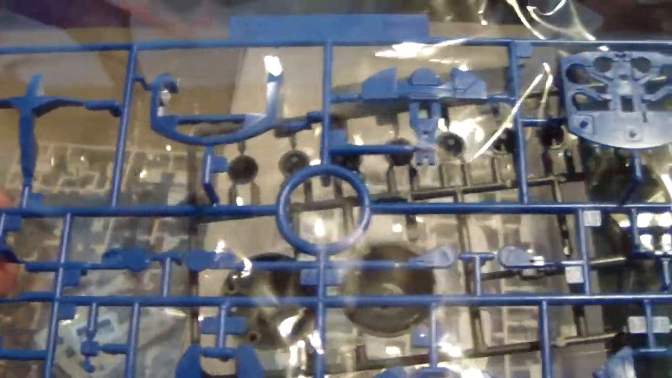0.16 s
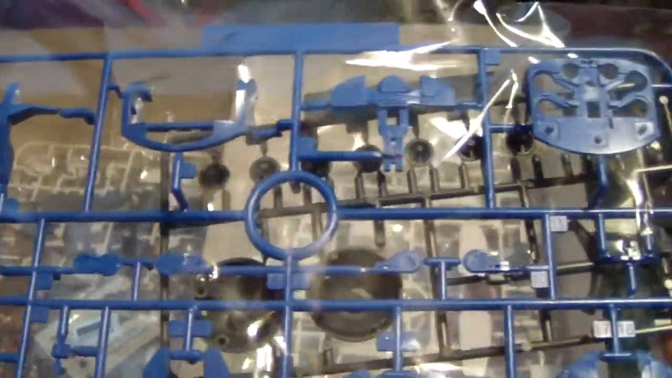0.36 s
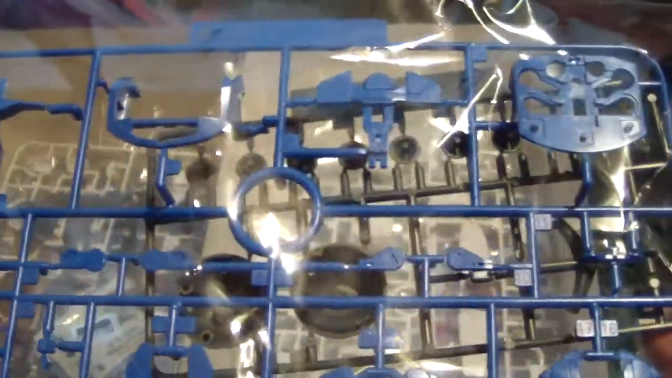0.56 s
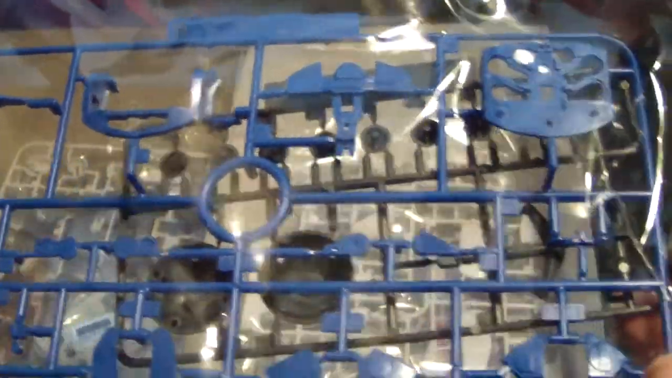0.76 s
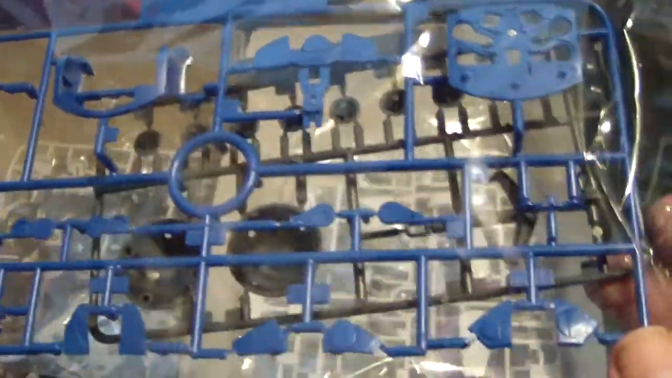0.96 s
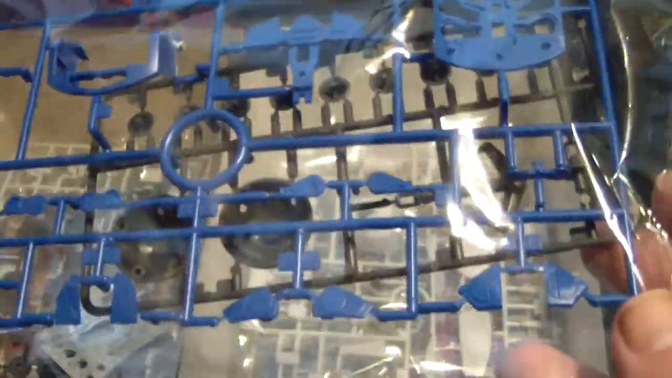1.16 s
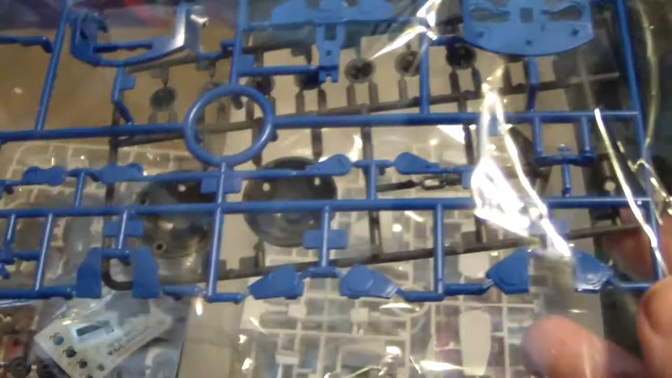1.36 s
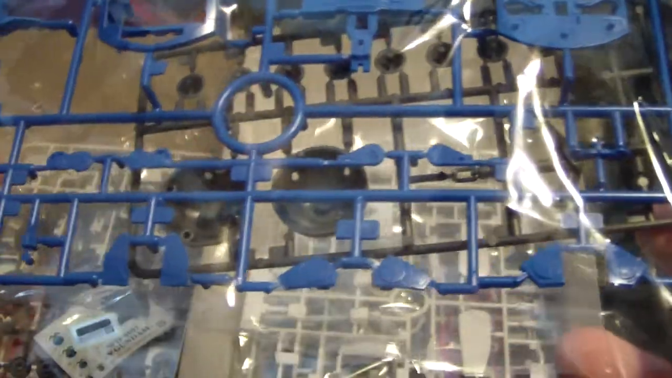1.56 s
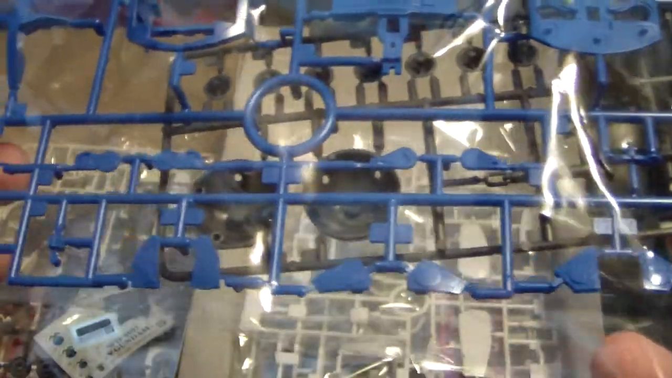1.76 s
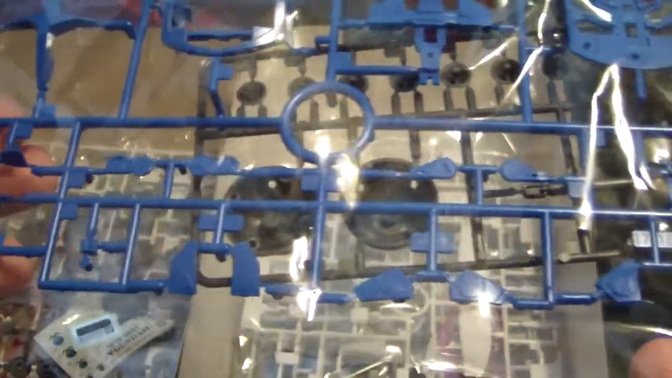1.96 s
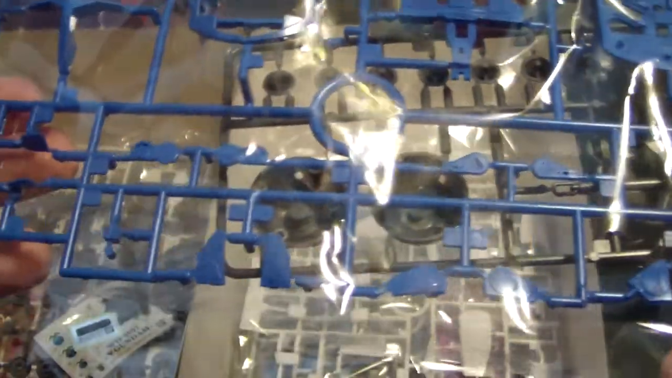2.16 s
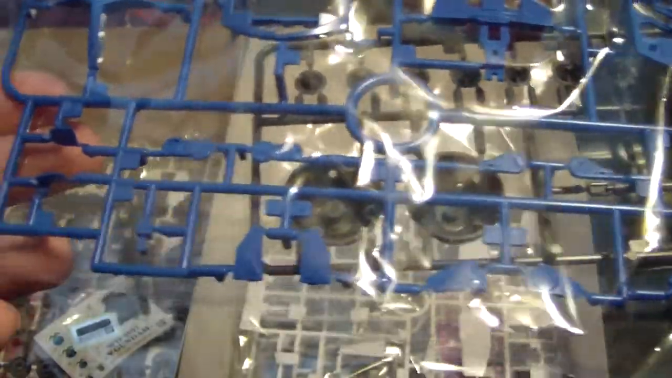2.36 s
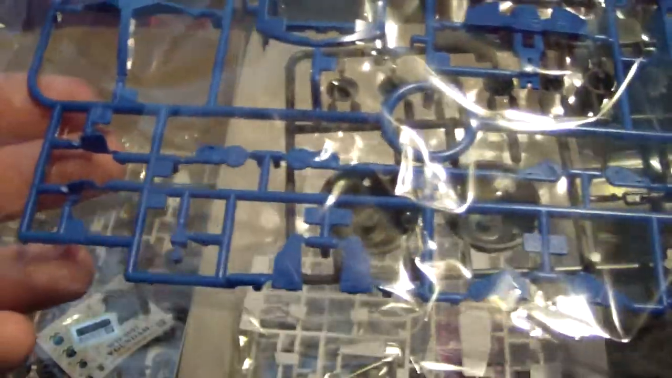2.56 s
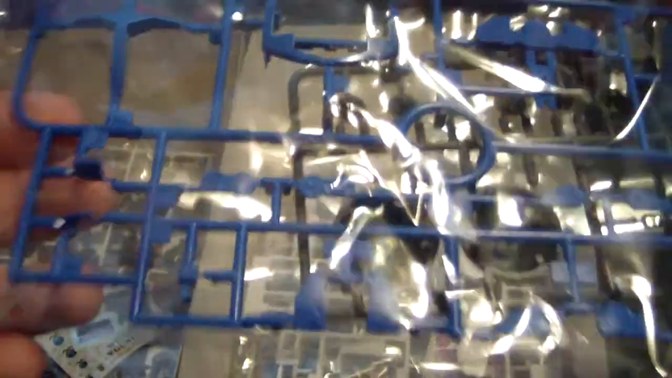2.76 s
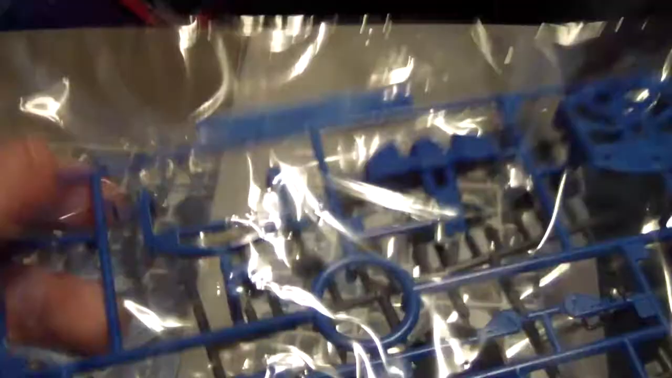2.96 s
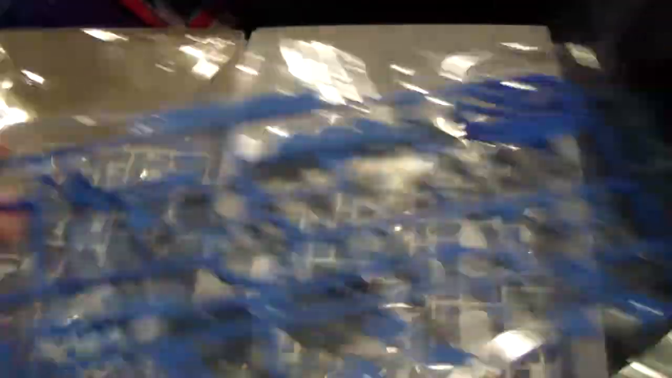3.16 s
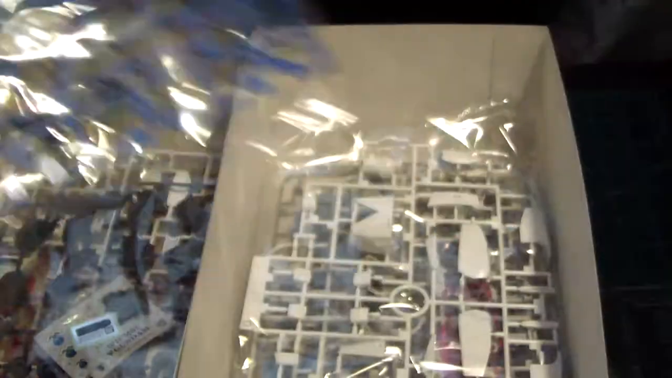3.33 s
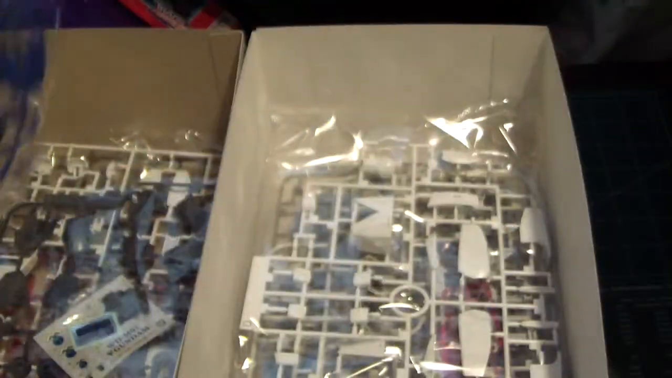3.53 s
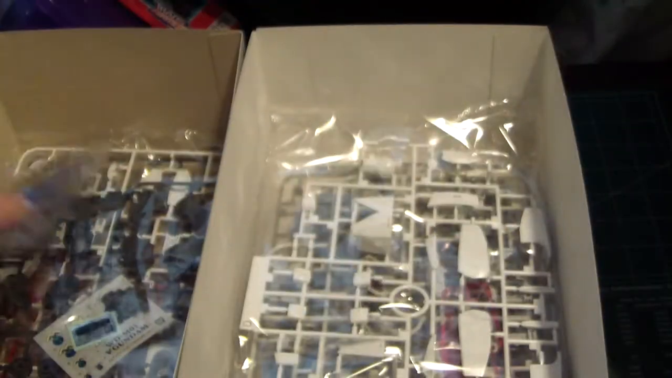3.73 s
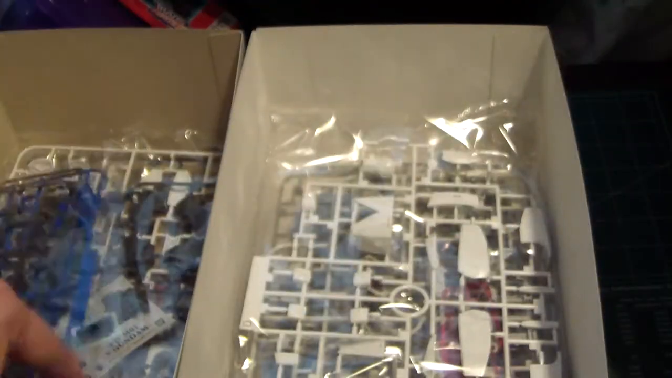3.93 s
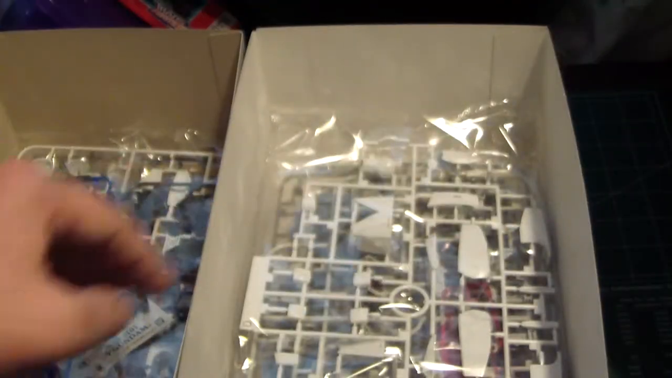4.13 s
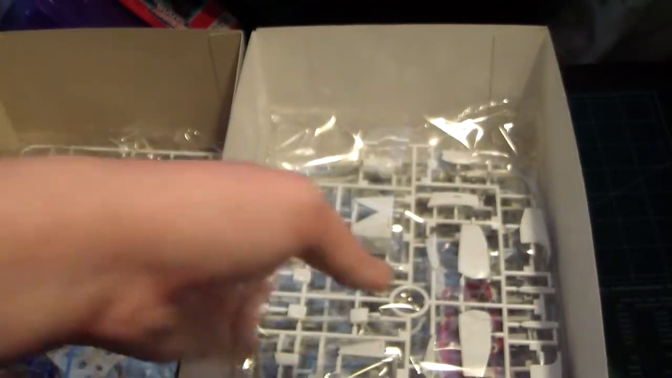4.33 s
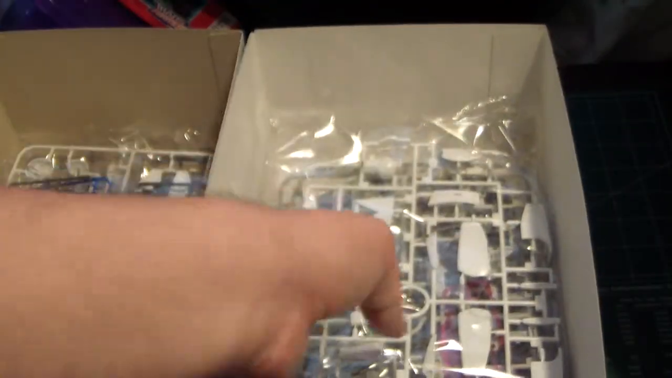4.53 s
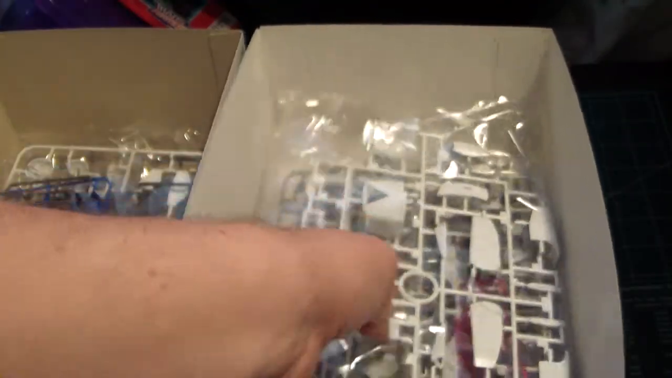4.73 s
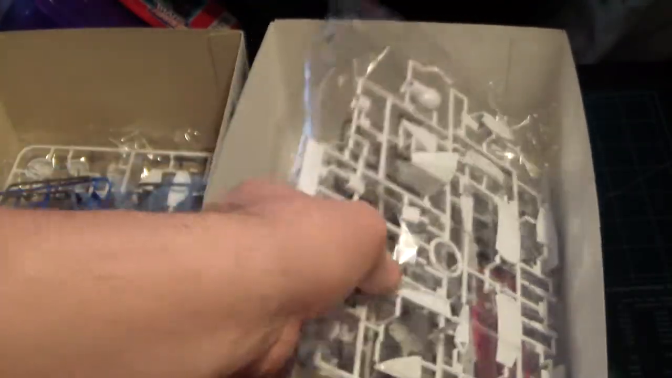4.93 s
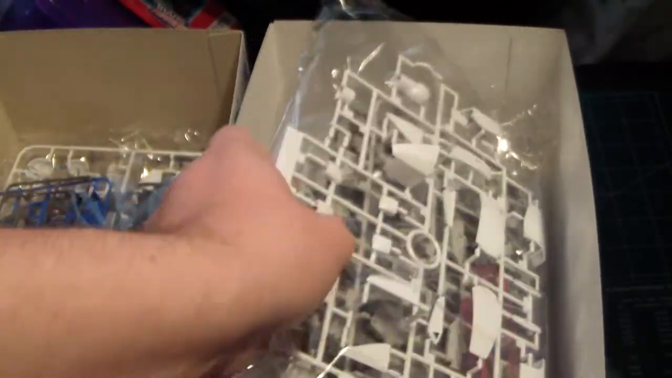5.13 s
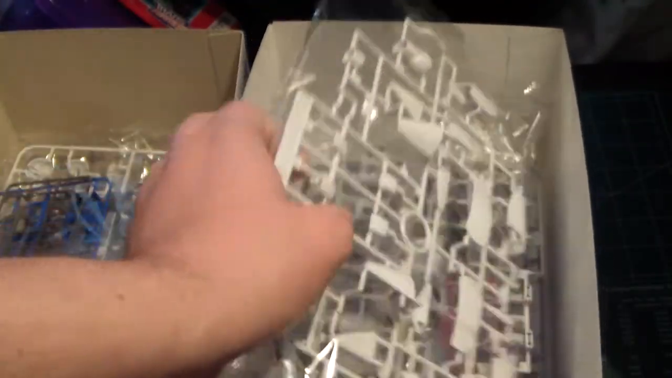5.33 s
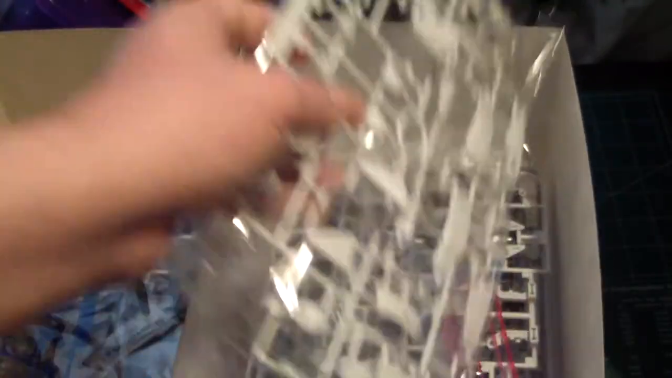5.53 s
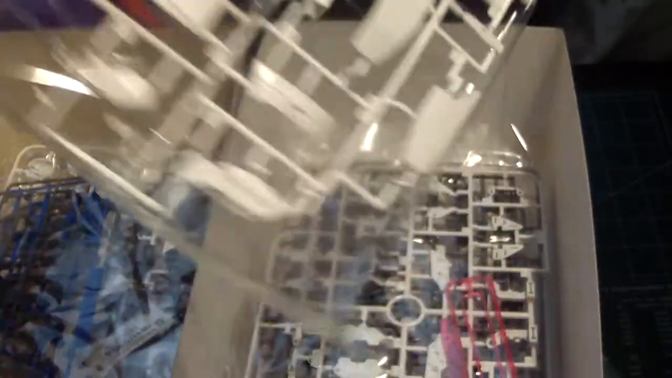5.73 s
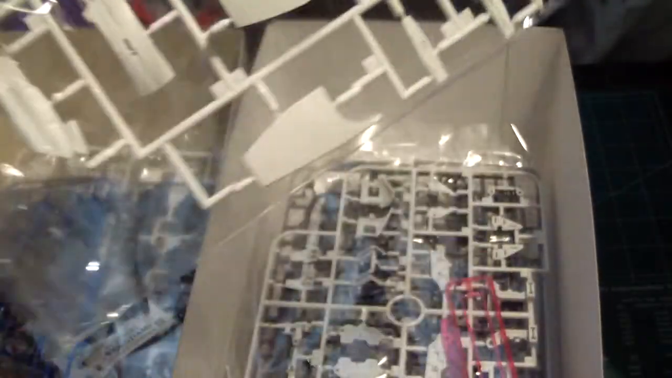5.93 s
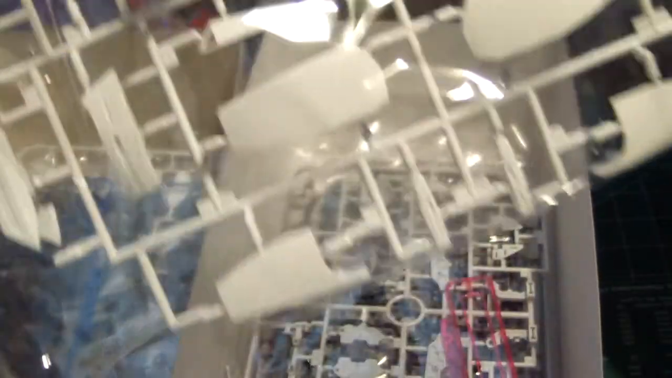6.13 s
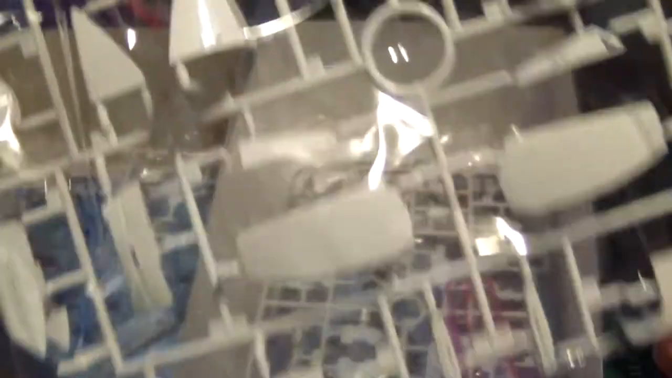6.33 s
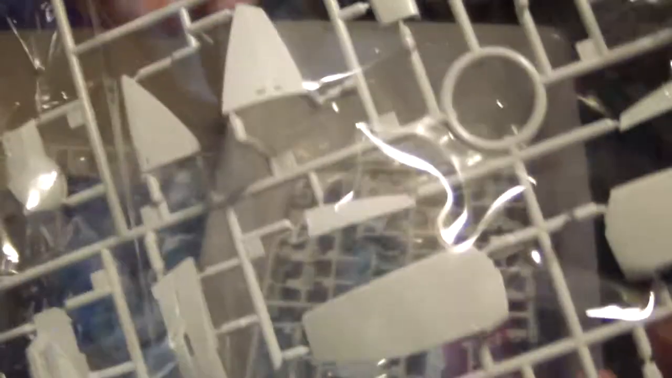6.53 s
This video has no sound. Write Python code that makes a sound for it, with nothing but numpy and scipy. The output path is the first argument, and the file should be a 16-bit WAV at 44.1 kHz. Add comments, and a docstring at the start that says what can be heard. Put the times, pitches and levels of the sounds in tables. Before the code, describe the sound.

Thin plastic bags of moulded parts crinkle and snap close up, faint at first, then in bursts with light rattles over a low fan hum.

```python
"""A thin plastic bag of moulded parts is held up and tilted, turned over, then laid in a cardboard box;
the next bag is gripped, pulled out and raised, all close to a pair of microphone ports.
Creases snap as short noise bursts in facet-sized bands, over crackle that follows the strokes of the hands.
Frames knock as rattles through ringing modes, and moving bags push puffs of low noise at the microphone.
Throughout, shaped noise makes the fan, wavering sines the mains hum, and sparse echoes the small room."""
import sys
import numpy as np
from scipy import signal
from scipy.fft import rfft, irfft
from scipy.io import wavfile
from scipy.ndimage import uniform_filter1d

SR = 44100
rng = np.random.default_rng(int(sys.argv[2]) if len(sys.argv) > 2 else 0)


def store_pcm(level_fs):
    """Save levels as 16-bit WAV."""
    pcm = np.round(np.clip(level_fs, -1, 1) * 32767).astype(np.int16)
    wavfile.write(sys.argv[1], SR, np.atleast_2d(pcm).T)


N = 290619  # samples, about 6.6 s

# the clearest buckling creases: t/s, facet f/Hz, level/dB (midway between facet and treble, before SNAP_LIFT_DB),
# brightness/dB (treble over facet), bite/dB (middle band over level), ring/ms (1/e, never under 0.2)
CLEAR_SNAPS = [(.3716, 1510, -15, 7, -11.5, 0.22), (.5438, 1800, -32.5, -10, 4, 1.8),
               (.5487, 970, -32, -15, 5, 0.49), (.6285, 800, -43.5, -20, 2, 1.1),
               (.6868, 2370, -28.5, -2, -5, 0.34), (.745, 1500, -35, -9, -15, 0.54),
               (.8197, 2416, -19, -1.5, -22, .9), (.836, 1946, -23.5, -8, -18, 0.23),
               (.8435, 2300, -30, 18, 1, 1.2), (.913, 1240, -25, -9.5, -1.5, 2.9),
               (.9517, 1404, -16.5, 3.5, -3.5, 0.95), (.9911, 2670, -14.5, 3.5, -8, 0.18),
               (1.004, 1473, -22, -1, -1, 0.33), (1.07, 1200, -30.5, 4, -0.5, 1.6),
               (1.2187, 1315, -18, -18.5, 0.5, .2), (1.5773, 1974, -28.5, -1, -7, 1.67),
               (1.601, 2237, -22, 6, -3, 0.93), (1.8694, 2436, -32, -3, 1, 0.96),
               (1.9212, 1800, -35, -2, 9.5, .4), (2.0342, 1730, -19, 14.5, 0, 0.89),
               (2.1583, 700, -34.5, 1, -5, 1), (2.3779, 2340, -19, 0.5, -3, 0.13),
               (2.4127, 2750, -30, 9, 6.5, .8), (2.5164, 2015, -34.5, -1, 9.5, .4),
               (2.7796, 1400, -28, -1, -1, 1.1), (2.7955, 1904, -25, 15, 1, 0.2),
               (2.817, 1890, -21, -2, 2, 1.5), (2.8472, 1300, -19, 2.5, -4.5, 0.45),
               (2.8847, 2000, -12, 6, -7, 1.6), (2.917, 2080, -8.5, 3, -5.5, 0.18),
               (2.9961, 2320, -15, -14.5, -17, 1.2), (3.029, 2423, -10, 6, -0.5, 0.86),
               (3.0566, 2200, -16, 8, -6, 0.48), (3.067, 1100, -14.5, 10, -0.5, 0.64),
               (3.0799, 2300, -18, 16, -2, 0.55), (3.0973, 1490, -17, 4, -1, 0.73),
               (3.116, 1300, -18.5, 16, 1, 1.7), (3.1462, 1400, -13.5, 11, -2, 1.3),
               (3.2015, 2370, -12.5, 6, -2, 0.75), (3.2177, 1700, -24, 7, 1, 0.49),
               (3.2494, 1254, -11, 5, -3.5, 1.4), (3.35, 2400, -32, 0, -16, 1.2),
               (3.4455, 1100, -33, -8, -2.5, 2.4), (3.6447, 1194, -17.5, 6.5, -6, 2.6),
               (3.6701, 1290, -12, 3.5, -2, 0.79), (3.6991, 2277, -14, 14, 3, 0.39),
               (3.739, 2240, -8, -1, -2.5, 1.7), (3.766, 1500, -17.5, 22, 0.5, 1.7),
               (3.8016, 2500, -21.5, 19, 4.5, 1.5), (3.8252, 1418, -19, 7, -1.5, 3),
               (3.8819, 1390, -16, 10, -14, 1.8), (3.9096, 1890, -19, 18, 0, .9),
               (3.9489, 1984, -12.5, 8, -1, 1.4), (3.9749, 1750, -9.5, 4, -2, 4.8),
               (4.0124, 1270, -17, 10, -1.5, 1.1), (4.026, 1320, -21.5, 26, -9, 0.89),
               (4.076, 2020, -9.5, 11, -3.5, 0.41), (4.1113, 2000, -25, 6, 3, 1),
               (4.1254, 978, -13, 15, -2, 1.3), (4.1646, 1615, -27, 4, 0, 1.7),
               (4.4521, 1200, -15.5, -7.5, -2.5, 4.6), (4.4935, 1610, -16.5, 12, -1, 3.1),
               (4.5371, 2010, -10, 8.5, -1.5, 1.2), (4.6313, 2220, -12.5, 16.5, 1, 1),
               (4.6951, 1692, -12, 6.5, -0.5, 3.3), (4.7002, 1400, -9, -1, -7, 1.6),
               (4.7572, 2170, -8, -0.5, -2, 1.1), (4.8488, 2216, -17.5, 14, 2, 0.68),
               (4.8829, 1403, -12.5, 2, -6.5, 2.9), (4.903, 2000, -15, 17, -4, 2.2),
               (4.9773, 2215, -27, 4, 8, .6), (4.9946, 1826, -11, 5, -1, 3.5),
               (5.0022, 1500, -11.5, 13, -3.5, 1.6), (5.1258, 2100, -24, 15, -7, .6),
               (5.1483, 2500, -16, 24, 4, 0.93), (5.1955, 1900, -17, 10, 0.5, 1.6),
               (5.2346, 2200, -14, 0, -6, 1.64), (5.2487, 980, -18.5, 15, -2, 0.85),
               (5.294, 2080, -11.5, 0, -17, 1.4), (5.3432, 2220, -12.5, 16, 2.5, 0.54),
               (5.4123, 1204, -18, 15, -3, .4), (5.475, 1326, -7.5, 7, -2.5, 2.8),
               (5.4933, 1900, -11.5, 4, -3.5, 1.6), (5.6046, 1660, -8, 4, -2, 2.2),
               (5.6512, 2300, -26.5, -17, 4, 1.4), (5.6777, 2400, -12, 7.5, -1.5, 2.4),
               (5.71, 1830, -19, 5, -4.5, 1.2), (5.7346, 1198, -26, -7.5, 3.5, 0.78),
               (5.778, 1290, -18.5, -7, -1.5, 3.3), (5.8168, 1385, -15.5, -3, 5.5, 0.29),
               (5.829, 1900, -15, 3.5, -1, 0.43), (5.8411, 1700, -18, 9, 1, .5),
               (5.854, 1500, -12, 20, -17, 0.58), (5.8806, 2400, -15.5, 8.5, -2, 0.53),
               (5.918, 2480, -18.5, -1, -4, 1.3), (5.956, 1290, -30, -7, 3, 1),
               (5.973, 1590, -18.5, 0, -4.5, 4.2), (5.979, 1690, -13, 13, 0.5, 0.48),
               (6.0001, 2520, -18.5, 19, 3.5, .4), (6.0427, 1800, -17.5, 5, -6, 3.2),
               (6.0565, 2606, -21, 20, 6, 0.99), (6.1347, 1720, -9, 10.5, -4.5, 2),
               (6.167, 2000, -22.5, 3, 1, 0.75), (6.1875, 1300, -29, -19, 0, 0.96),
               (6.2443, 1870, -9, -2.5, -1, 0.55), (6.2729, 1930, -14, 8, -1.5, 2.5),
               (6.311, 1600, -24, -4, -4, 1.5), (6.3711, 889, -22.5, -8.5, -3, 3.6),
               (6.383, 1204, -20.5, -3, -3, 1.7), (6.4045, 2010, -33, -20, -4, 0.51),
               (6.4604, 2150, -7.5, 12, -2, 0.68), (6.5242, 1900, -16.5, 7.5, 2, 2),
               (6.5885, 1100, -10.5, 17, -4, 1.4)]
# sparkle bands, middle then treble: low f/Hz, high f/Hz
SPARKLE_BANDS = [(2900, 5230), (6600, 13350)]
# colour of all the snaps: f/Hz, level/dB (filter gain)
SNAP_TONE = [(300, 1.5), (1200, -0.5), (4000, 4), (5800, 2), (8000, 3.5), (10000, 1.5), (12500, -2),
             (16000, 2.5)]
SNAP_LIFT_DB = 15.5


def snaps(level_db, size=900, after=0.047, after_ms=5, breadth=1.48, flap_db=-8, flap_lo_hz=330):
    """A crease flips: a facet of film rings for a few milliseconds at most under a bright shiver."""
    creases = CLEAR_SNAPS + lesser_snaps(level_db)
    out = np.zeros((2, N))
    ms = np.arange(size) * 1000 / SR
    ring_ms = np.maximum(np.array(creases)[:, -1, None, None], .2)
    shivers = rng.standard_normal((len(creases), 2, size))
    shivers *= np.exp(-ms / ring_ms) + after * np.exp(-ms / after_ms)  # the rest of the sheet rings on faintly
    sparkle = np.stack([band(shivers, lo, hi) for lo, hi in SPARKLE_BANDS], 1)
    for (s, facet_hz, db, bright_db, bite_db, _), shiver, bright in zip(creases, shivers, sparkle):
        levels_db = [db - bright_db / 2, db + bite_db, db + bright_db / 2]  # facet, middle, treble
        facet = band(shiver, facet_hz / breadth, facet_hz * breadth)
        # the slack film around it moves too
        flap = band(shiver, flap_lo_hz, max(facet_hz / 2, flap_lo_hz + 100))
        parts = np.array([facet - amp(flap_db) * flap, *bright])
        parts /= np.linalg.norm(parts, axis=-1, keepdims=True)
        add(out, s, np.tensordot(amp(levels_db), parts, 1))
    return amp(SNAP_LIFT_DB) * colour(out, SNAP_TONE)


# lesser creases: rate and level (before SNAP_LIFT_DB) are those under a firm grip
FIRM_DB, LESSER_PER_S, LESSER_DB = -23, 32, -23
LESSER_RATE_LAW, LESSER_LEVEL_LAW = .4, 0.62  # dB of rate and of level per dB of flexing


def lesser_snaps(level_db, facet_hz=1700, spread_octaves=0.49, spread_db=4.0, bright_db=5,
                 bright_spread_db=6, bite_db=-3, bite_spread_db=4, ring_ms=1.5, count=500):
    """Chance snaps, as rows like CLEAR_SNAPS: harder flexing makes them more frequent and louder."""
    rows = []
    draws = rng.random((count, 2))
    characters = np.clip(rng.standard_normal((count, 4)), -2, 2)
    for (place, chance), (pitch, strength, tint, bite) in zip(draws, characters):
        effort_db = level_db[int(place * N)] - FIRM_DB
        per_s = LESSER_PER_S * amp(LESSER_RATE_LAW * effort_db)
        if chance < per_s * N / SR / count:
            rows.append((place * N / SR,
                         facet_hz * 2 ** (spread_octaves * pitch),
                         LESSER_DB + LESSER_LEVEL_LAW * effort_db + spread_db * strength,
                         bright_db + bright_spread_db * tint,
                         bite_db + bite_spread_db * bite,
                         ring_ms))
    return rows


# colour of the crackling film: f/Hz, level/dB (filter gain)
FILM_TONE = [(150, -35), (250, 6), (460, -1), (510, 0.5), (845, -1.5), (1220, 3.5), (1450, -3.5),
             (1700, -0.5), (2490, 0), (3230, 1.5), (5830, -4.5), (7060, 0), (9830, 0), (15200, -5),
             (16000, -6)]


def crackle(level_db, taut_db, per_s=1100, spread_db=0.0, clump_db=1.5, facet_db=5, patch_db=2, count=9):
    """Many tiny creases give way, more often under harder flexing, while film rubs on film."""
    ring_s, rub = .0004, .4
    rate = per_s * amp(0.35 * (level_db + 24))  # per_s holds at -24 dB
    gives_way = rng.random(N) < rate / SR
    strength = amp(spread_db * np.minimum(rng.exponential(1, N), 3.2))  # a spread of 0 makes all pops equal
    pops = gives_way * strength / np.sqrt(rate)
    grip = np.clip(amp(0.4 * (level_db + 25.5)), 0, 1)  # lightly touched film slides more than it buckles
    edges = np.geomspace(300, 17000, count + 1)
    out = np.zeros((2, N))
    for lo, hi in zip(edges, edges[1:]):
        # each crease shakes small and large facets of the film by different amounts
        kicks = pops * amp(facet_db * np.clip(rng.standard_normal(N), -2, 2))
        ringing_power = signal.lfilter([1], [1, -np.exp(-2 / (ring_s * SR))], kicks ** 2 + 1e-20)
        shiver = unit(np.sqrt(ringing_power))
        hiss = (grip * shiver + rub) * rng.standard_normal((2, N))
        out += band(hiss, lo, hi) * amp(patch_db * wander(45))
    out = colour(out * amp(clump_db * wander(130)), FILM_TONE)
    # level out over 27 ms: the hand sets the overall strength
    out /= np.sqrt(abs(uniform_filter1d((out ** 2).mean(0), size=1200)) + 1e-20)
    dull = signal.sosfilt(signal.butter(1, 4500, fs=SR, output="sos"), out)
    tilt = amp(taut_db / 2)
    tilted = dull / tilt + (out - dull) * tilt
    return amp(level_db) * tilted / np.sqrt((tilt ** 2 + tilt ** -2) / 2)


# each push, pull or slide of the hands on the film: start t/s, length t/s, crackle level/dB (mid-stroke,
# before CRACKLE_LIFT_DB), swell/dB (start to end), tautness/dB (treble tilt)
HAND_STROKES = [(.72, .29, -46.5, 13, 2), (0.832, 0.019, -31.5, 3.5, 1), (1.08, .16, -49, 2, -0.5),
                (1.406, 0.047, -47, -2.5, 11), (1.567, .05, -47.5, 4, 4), (1.709, 0.32, -51, -13, 7),
                (1.99, 0.52, -52.5, -2, -1), (2.712, 0.26, -40, 16.5, 0), (2.985, 0.067, -23.5, -0.5, -8),
                (3.114, 0.038, -22.5, 0.5, 0), (3.175, 0.11, -39.5, -10, -6), (3.344, 0.25, -46.5, -3.5, 4),
                (3.594, 0.039, -39.5, 6, -1), (3.656, 0.096, -23, -2.5, -1), (3.8, 0.16, -28, 8.5, 3.5),
                (3.975, 0.068, -28.5, 6, -6), (4.093, 0.098, -40.5, -16, -1), (4.31, 0.11, -58, 0, -14),
                (4.461, 0.16, -29.5, 6.5, -9), (4.671, 0.11, -29, -9.5, -3.5), (4.811, .19, -23, -1, -0.5),
                (5.066, 0.11, -22.5, -0.5, -1), (5.209, 0.039, -22.5, -0.5, -1),
                (5.282, 0.057, -23, -3, -7), (5.365, 0.12, -21.5, 1.5, -6), (5.512, .09, -24, 3, 3),
                (5.621, 0.12, -32.5, -5, 3), (5.778, 0.075, -27.5, -2, -10), (5.893, 0.068, -42, 0, -4),
                (5.984, .2, -35.5, -2, 1), (6.243, .13, -40.5, -11, -17), (6.43, 0.021, -24, -2.5, 0),
                (6.502, 0.16, -33.5, -2, -4)]
ATTACK_S, RELEASE_S = 0.0111, 0.02  # 1/e build before a stroke and decay after it
REST_DB, REST_TAUT_DB = -59, -32  # film that is barely touched


def flexing():
    """How hard the film is worked and how taut it is, in dB: each stroke builds, swells or sinks, lets go."""
    t = np.arange(N) / SR
    power = np.full(N, amp(REST_DB) ** 2)
    taut = power * REST_TAUT_DB
    for start, length, db, swell_db, taut_db in HAND_STROKES:
        outside = np.maximum(start - t, 0) / ATTACK_S + np.maximum(t - start - length, 0) / RELEASE_S
        progress = np.clip((t - start) / length, 0, 1)
        stroke = (amp(db + swell_db * (progress - .5)) * np.exp(-np.minimum(outside, 20))) ** 2
        power = power + stroke
        taut = taut + stroke * taut_db  # the louder stroke weighs more
    return 10 * np.log10(power), taut / power


# frames bumping in their bags and on the box: t/s, level/dB (before KNOCK_TRIM_DB), depth/dB (bass over mid)
FRAME_BUMPS = [(.959, -37, -10), (1.217, -40, -25), (2.831, -30, -7.5), (2.959, -25, 4), (3.012, -25.5, -2),
               (3.132, -29, -11), (3.202, -33, 5), (3.68, -29.5, 9), (4.457, -23.5, -14), (4.615, -31, -5),
               (4.688, -37, -11), (4.864, -27.5, -27), (4.936, -32.5, -21), (5.135, -35, 1.5),
               (5.225, -27.5, -33), (5.306, -33, 2), (5.384, -26.5, -22), (5.473, -28.5, -14),
               (5.605, -33, 4), (5.826, -30, 9), (6.043, -32, 4), (6.135, -35.5, 8), (6.187, -29, 8),
               (6.284, -35, 15), (6.428, -27, 9), (6.523, -30.5, 3)]
# what the frames and the box ring with: f/Hz, level/dB, t60/s
FRAME_MODES = [(112.7, -21, 0.38), (182, -6, .12), (226, -0.5, 0.089), (287, -2.5, 0.058), (350, 1.5, 0.1),
               (395, -23, 0.053), (456, 2.5, 0.064), (570, -11, 0.021), (615, 4, 0.037), (874, -0.5, 0.039),
               (1140, -7, 0.035)]
KNOCK_TRIM_DB = -9.5


def knocks(size=8000, rattle_s=0.0062, pivot_hz=290):
    """Each bump is a short rattle of contacts that rings the frames and the cardboard."""
    out, t = np.zeros(N), np.arange(size) / SR
    hz, mode_db, t60 = np.transpose(FRAME_MODES)[:, :, None]
    for s, db, depth_db in FRAME_BUMPS:
        held_hz = hz * rng.uniform(0.95, 1.05, hz.shape)  # the grip shifts the modes a little
        below_pivot = np.clip(2 * np.log2(pivot_hz / held_hz), -1, 1)
        weight = amp(mode_db + .5 * depth_db * below_pivot)
        ring = (weight * amp(-60 * t / t60) * np.sin(2 * np.pi * held_hz * t)).sum(0)
        rattle = rng.standard_normal(size) * np.exp(-t / rattle_s)
        bump = signal.fftconvolve(rattle, ring)[:size]
        add(out, s, amp(db + KNOCK_TRIM_DB) * unit(bump))
    return out


CRACKLE_LIFT_DB = 0.66


def bags():
    """Film and frames with their echoes, as two waves: unrelated film noise, the same knocks."""
    level_db, taut_db = flexing()
    direct = amp(CRACKLE_LIFT_DB) * crackle(level_db, taut_db) + knocks() + snaps(level_db)
    return [wave + room(wave) for wave in direct]


# room decay: f/Hz, t60/s
ROOM_DECAY = [(200, 0.28), (1300, 0.08), (4000, 0.24), (9000, 0.097), (16000, 0.19)]


def room(x, near_db=-14, far_db=-19, near_s=0.0044, size=12000):
    """Quick echoes from the box and table, then the short tail of the room."""
    t = np.arange(size) / SR
    strengths = rng.standard_normal((2, size))
    sparse = rng.random((2, size)) < 6000 / SR  # 6000 echoes a second
    taps = strengths * sparse * (t > .002)
    near = taps[0] * np.exp(-t / near_s)
    hz, at, z = signal.stft(taps[1] * (t > .006), SR, nperseg=256)
    decay = amp(-60 * at / read(ROOM_DECAY, hz)[:, None])
    far = signal.istft(z * decay, SR, nperseg=256)[1][:size]
    echoes = amp(near_db) * near / np.linalg.norm(near) + amp(far_db) * far / np.linalg.norm(far)
    return signal.oaconvolve(x, echoes)[:N]


# puffs of air pushed by moving bags and arms: peak t/s, level/dB (at the peak), 1/e rise and fall t/s
AIR_PUFFS = [(2.52, -39.5, 0.1), (3.02, -29.5, 0.066), (4.22, -37, 0.088), (4.5, -35, 0.054),
             (6.25, -38, 0.14), (6.445, -24, 0.012), (6.585, -25, 0.017)]
# spectrum of the moving air: f/Hz, level/dB (relative, per Hz)
AIR_TONE = [(12, -26), (40, 3), (80, 3), (120, -1), (220, -20.5), (600, -60), (2000, -98)]
# left-right likeness of air and fan: f/Hz, likeness (0-1)
AIR_FAN_LIKENESS = [(25, 0.8), (70, 0.7), (200, 1), (700, 0.9), (2000, 0.16), (8000, 0)]
STILL_AIR_DB = -53.5


def draught():
    """Soft low buffeting of the microphone."""
    t = np.arange(N) / SR
    puffs = sum(amp(db) * np.exp(-abs(t - s) / width_s) for s, db, width_s in AIR_PUFFS)
    return pair(*noise(AIR_TONE), AIR_FAN_LIKENESS) * np.hypot(puffs, amp(STILL_AIR_DB))


# fan spectrum: f/Hz, level/dB (relative, per Hz)
FAN_TONE = [(12, -18), (30, 2.5), (60, 0), (95, -1.5), (170, 0), (280, 0.5), (460, -2), (650, -8.5),
            (900, -16), (1400, -17.5), (2200, -22), (4500, -27.5), (9000, -26), (16000, -28.5)]
# mains hum: f/Hz, level/dB (rms)
MAINS_HUM = [(59, -49), (119.8, -45.5)]
FAN_DB = -42.5


def background():
    """A steady fan as shaped noise and a mains hum of sines whose phase wavers slightly."""
    t = np.arange(N) / SR
    hum = sum(amp(db) * np.sqrt(2) * np.sin(2 * np.pi * hz * t + 0.79 * wander(1.87))
              for hz, db in MAINS_HUM)
    return amp(FAN_DB) * pair(*noise(FAN_TONE), AIR_FAN_LIKENESS) + hum


# the right port hears more, chiefly in the bass: f/Hz, level/dB (left minus right)
PORT_BALANCE = [(40, -7.5), (500, -2), (1100, -2.5), (2200, -.4), (9000, -1)]


def pair(shared, other, likeness):
    """Two microphone ports whose likeness and balance depend on frequency."""
    hz = np.fft.rfftfreq(N, 1 / SR)
    same = np.clip(read(likeness, hz), 0, 1)
    lean = amp(read(PORT_BALANCE, hz) / 2)
    mid = rfft(shared) * np.sqrt((1 + same) / 2)
    side = rfft(other) * np.sqrt((1 - same) / 2)
    return irfft(np.array([(mid + side) * lean, (mid - side) / lean]), N)


def noise(points):
    """Two unrelated steady noises with the given spectrum, scaled together to rms 1."""
    gain = amp(read(points, np.fft.rfftfreq(N, 1 / SR)))
    return unit(irfft(rfft(rng.standard_normal((2, N))) * gain, N))


def wander(hz):
    """Slow chance of rms 1, moving at up to hz."""
    steps = 2 * hz * np.arange(N) / SR
    return unit(np.interp(steps, np.arange(4096), rng.standard_normal(4096)))


def colour(x, points, size=4096):
    """Causal (minimum-phase) filter with the given spectrum, so that attacks stay sharp."""
    cepstrum = irfft(np.log(amp(read(points, np.fft.rfftfreq(size, 1 / SR)))))
    folded = np.r_[cepstrum[0], 2 * cepstrum[1:size // 2]]
    taps = irfft(np.exp(rfft(folded, size)))[:size // 2]
    return signal.oaconvolve(x, taps[None], axes=1)[:, :N]


def band(x, lo_hz, hi_hz):
    """Causal band-pass."""
    edges = [lo_hz, min(hi_hz, SR / 2 - 1)]
    return signal.sosfilt(signal.butter(2, edges, "band", fs=SR, output="sos"), x)


def read(points, hz):
    """Reads a spectrum table on a log-frequency axis."""
    f, value = np.transpose(points)
    return np.interp(np.log(hz + 1), np.log(f + 1), value)


def amp(db):
    """Decibels to gain."""
    return 10 ** (np.asarray(db) / 20)


def unit(x):
    """Scales to rms 1."""
    return x / np.sqrt(np.mean(x ** 2) + 1e-20)


def add(mix, s, sound):
    """Mixes a sound in at time s."""
    part = mix[..., max(round(s * SR), 0):][..., :sound.shape[-1]]
    part += sound[..., :part.shape[-1]]


# left-right likeness of the bags: f/Hz, likeness (0-1)
FILM_LIKENESS = [(200, 0.95), (2800, 1), (5500, 0.91), (9000, 0.77), (14000, 0.51)]


def scene():
    """Bags in front of the microphone, in a humming room."""
    return pair(*bags(), FILM_LIKENESS) + background() + draught()


EDGE_HZ = 16150


def record(dry):
    """Peaks saturate smoothly towards full scale; then a steep low-pass limits the band."""
    edge = signal.firwin(511, EDGE_HZ, window=("kaiser", 9), fs=SR)
    knee = 6  # higher is a harder clip
    clipped = dry / (1 + abs(dry) ** knee) ** (1 / knee)
    return signal.oaconvolve(clipped, edge[None], "same")


dry = scene()
out = record(dry)
store_pcm(out)
```